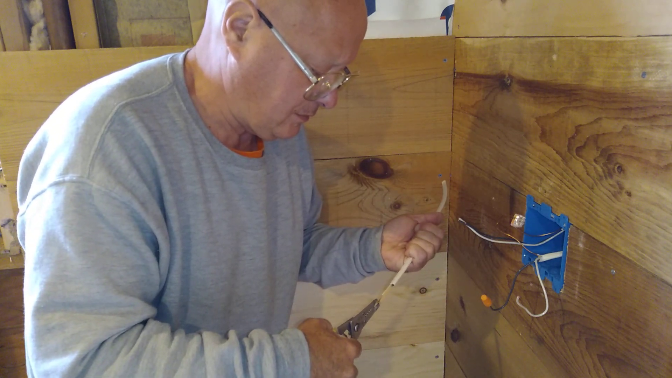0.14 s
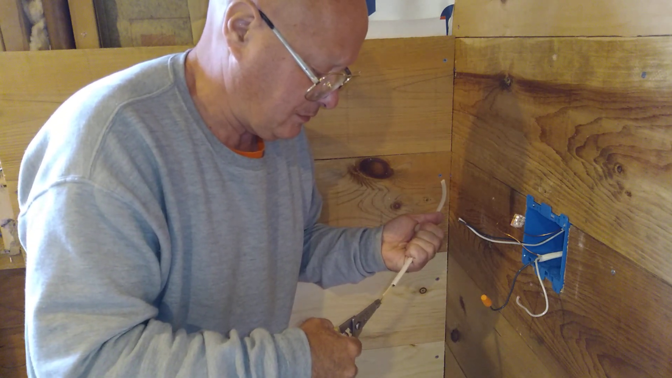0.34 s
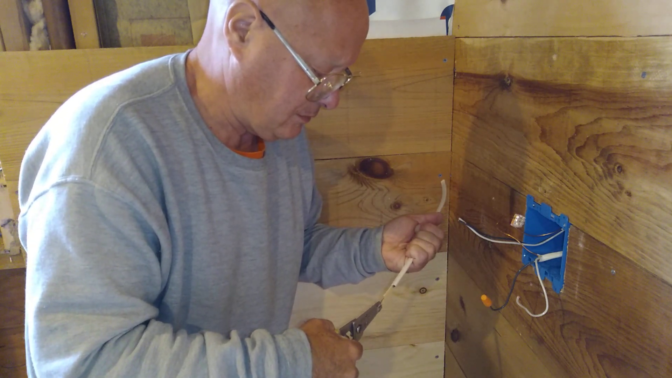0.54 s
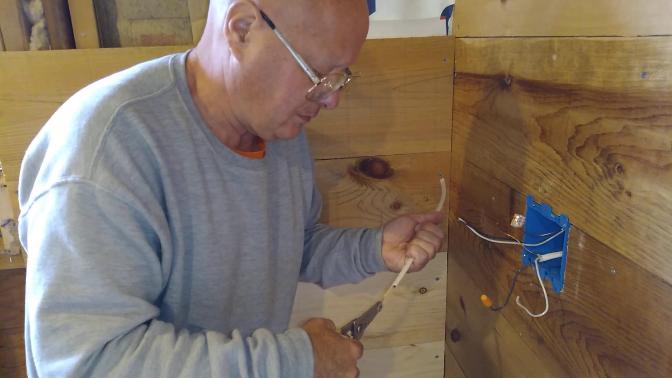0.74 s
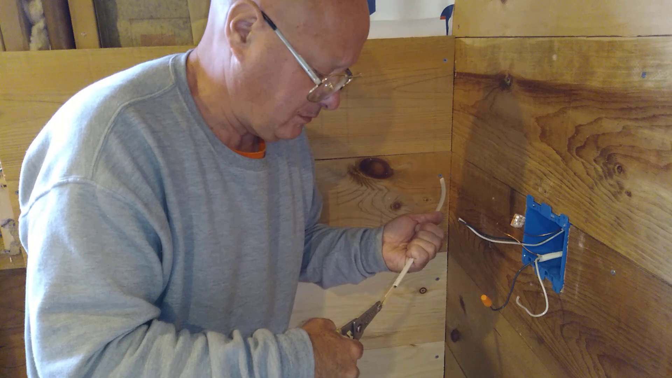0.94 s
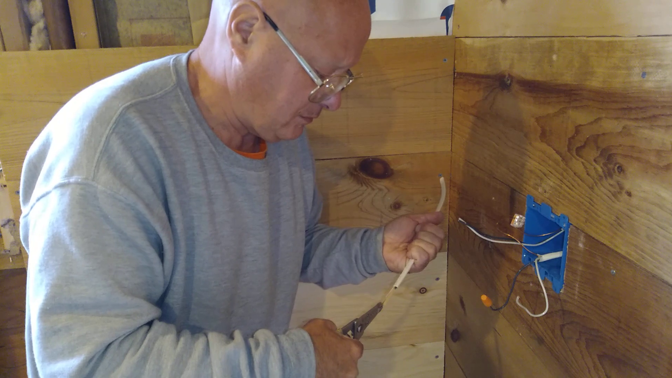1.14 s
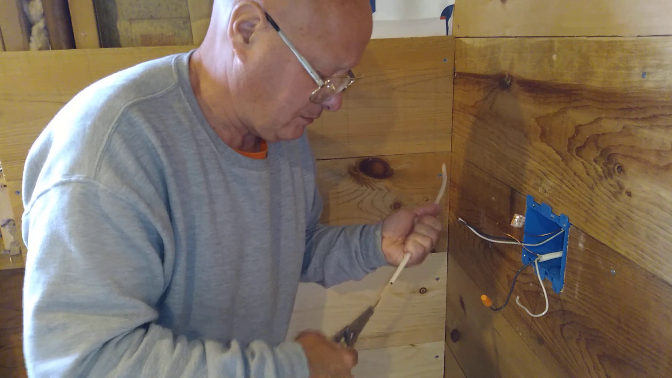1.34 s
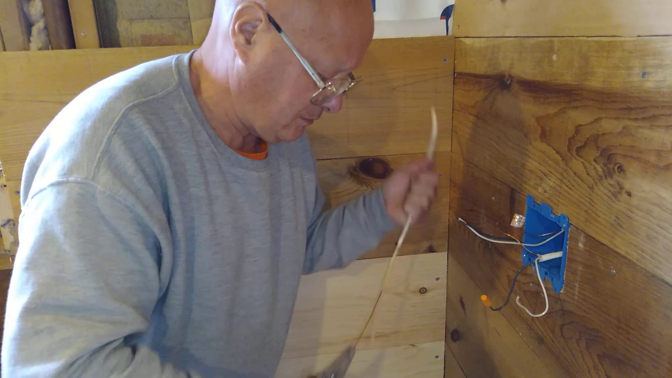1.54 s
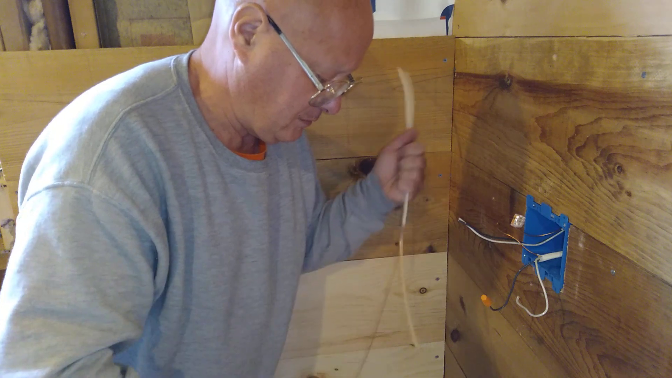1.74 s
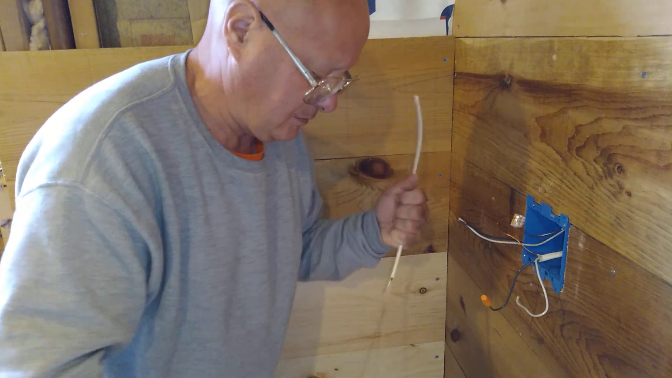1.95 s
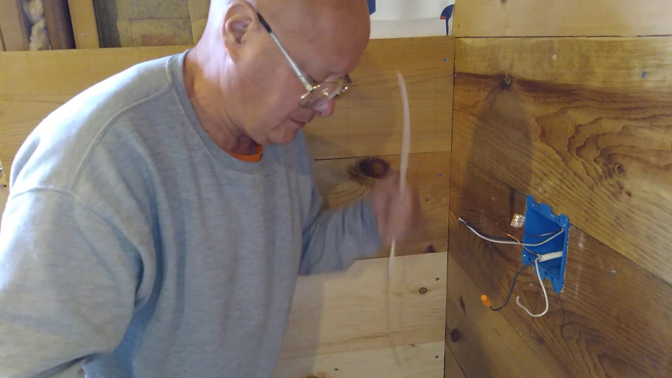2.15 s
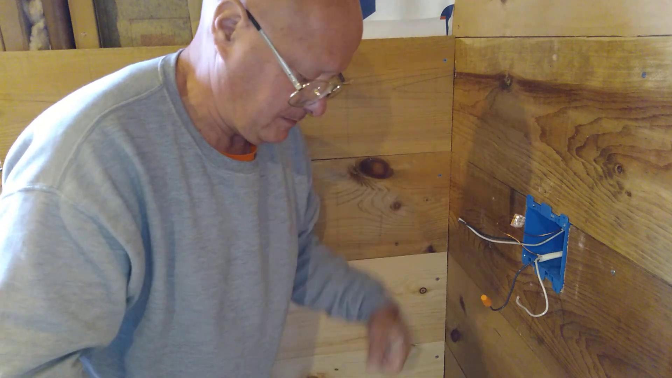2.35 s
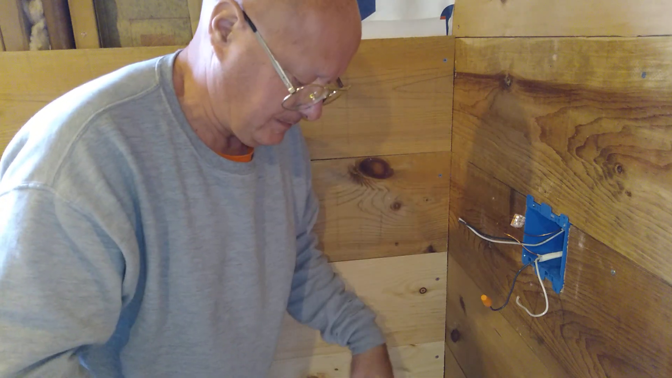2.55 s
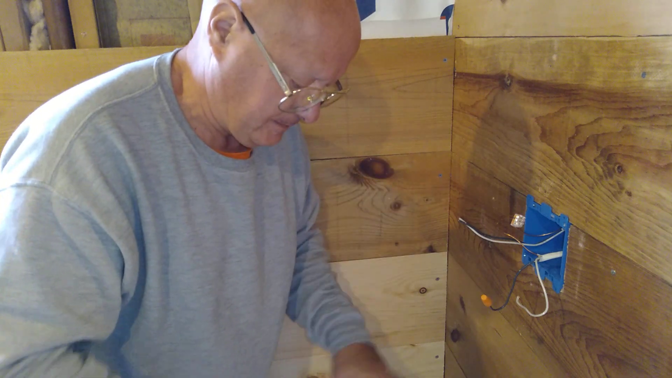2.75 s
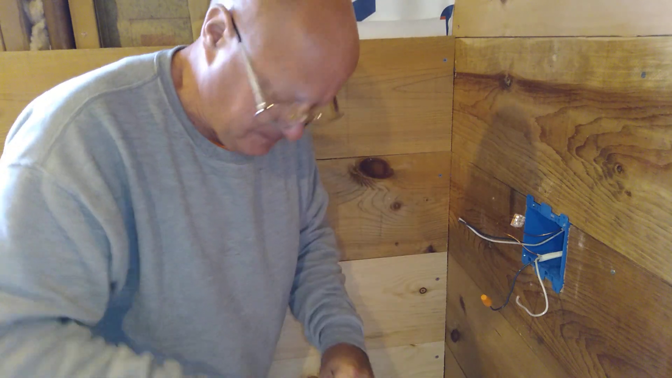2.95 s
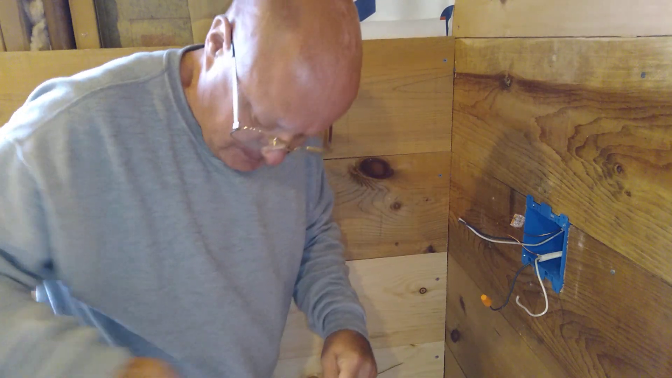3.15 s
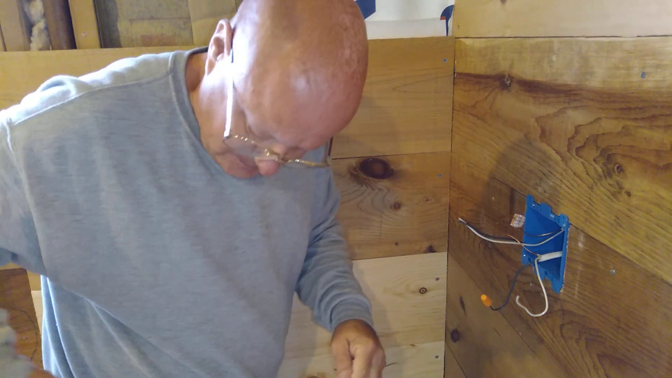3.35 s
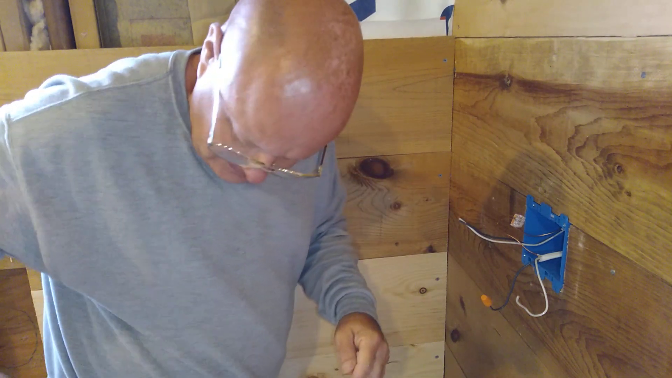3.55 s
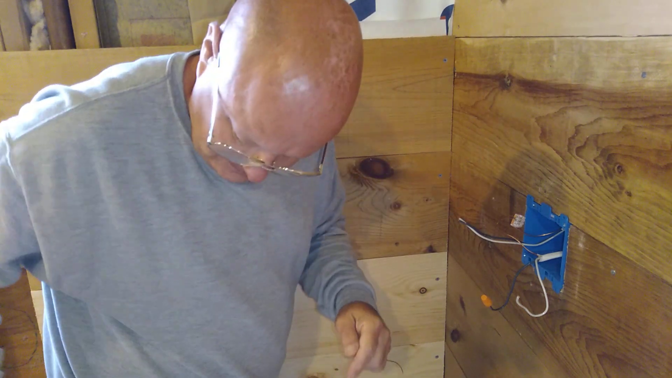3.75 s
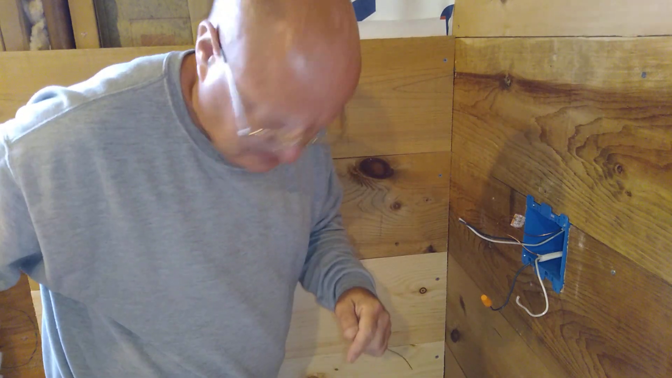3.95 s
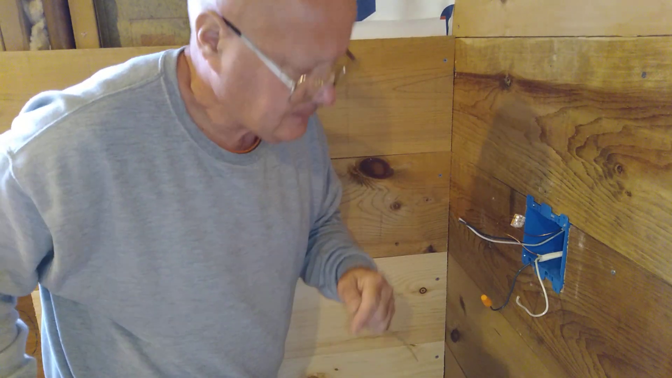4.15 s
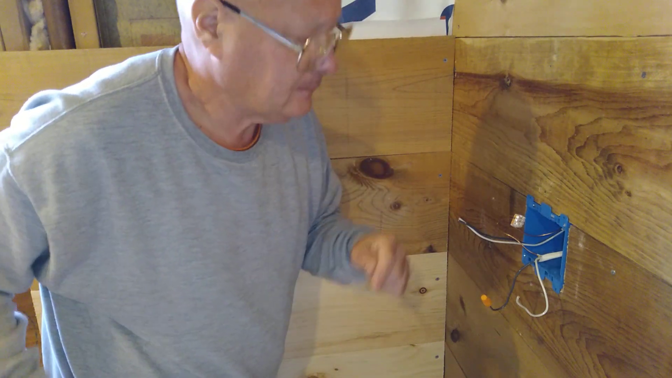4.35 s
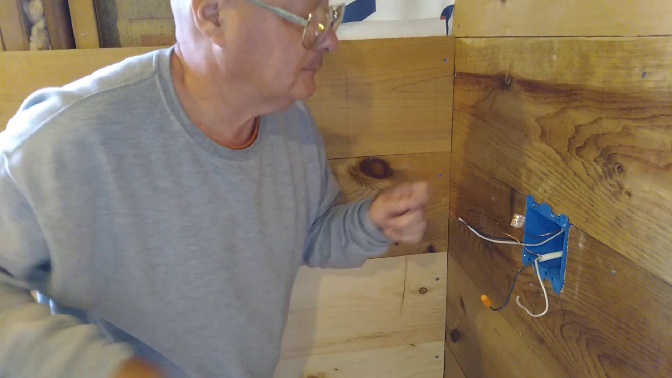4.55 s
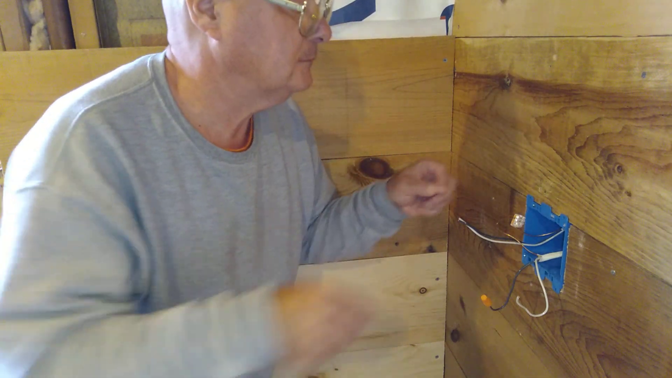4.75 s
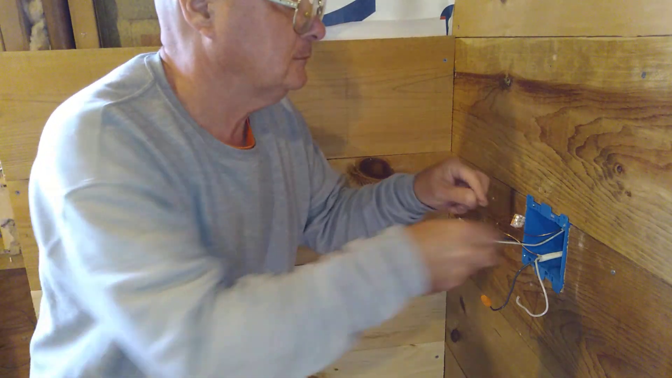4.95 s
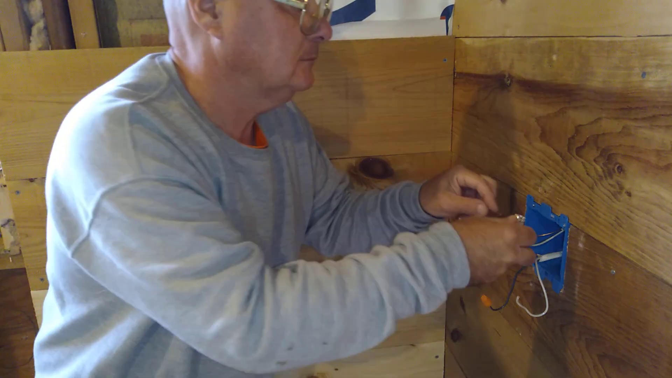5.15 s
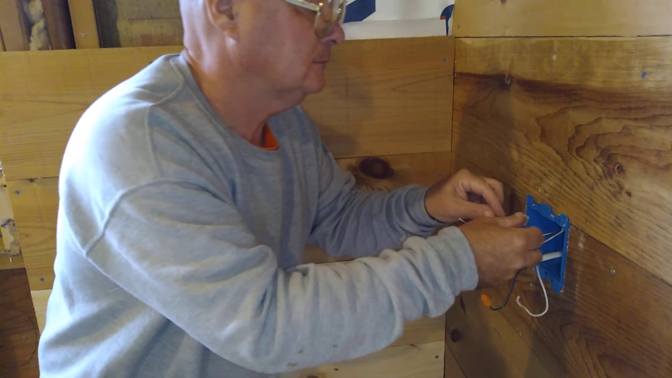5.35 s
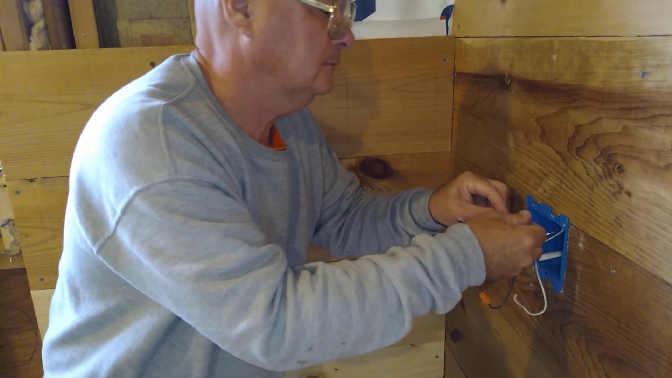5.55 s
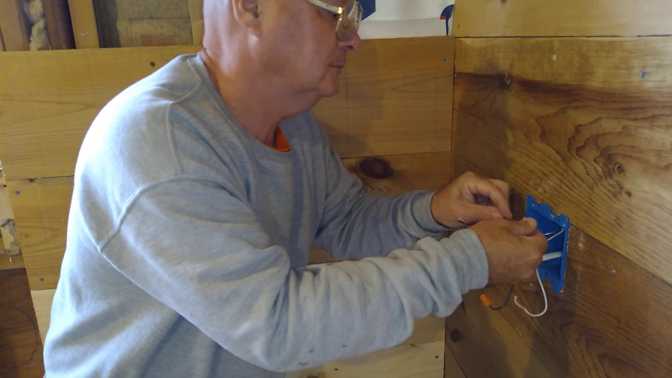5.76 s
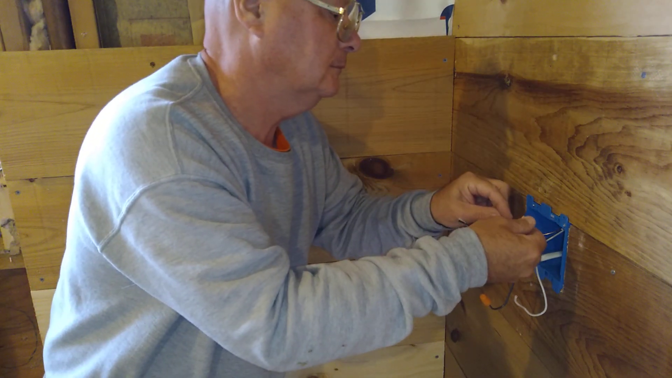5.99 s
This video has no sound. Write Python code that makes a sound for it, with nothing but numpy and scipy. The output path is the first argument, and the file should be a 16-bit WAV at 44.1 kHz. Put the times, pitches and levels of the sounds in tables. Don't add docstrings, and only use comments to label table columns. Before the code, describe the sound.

Cloth sleeves rustle and a hand tool ticks faintly in a quiet wooden room, then the tool drops on a board with one sharp snap.

```python
import sys
import numpy as np
from scipy import signal
from scipy.fft import rfft, irfft
from scipy.io import wavfile

SR = 44100
rng = np.random.default_rng(int(sys.argv[2]) if len(sys.argv) > 2 else 0)


def to_wav(sig):
    pcm = np.clip(np.atleast_2d(sig), -1, 1) * 32767
    pcm = np.round(pcm).astype(np.int16)
    wavfile.write(sys.argv[1], SR, pcm.T)


def invert_db(level):
    return 10 ** (np.asarray(level, dtype=float) / 20)


N = 265614


def clock(seconds):
    return np.arange(round(seconds * SR)) / SR


def in_time(rows):
    s, *columns = np.transpose(rows)
    return [np.interp(np.arange(N) / SR, s, c) for c in columns]


def at_hz(points, hz):
    table_hz, values = np.transpose(points)
    return np.interp(np.log(np.maximum(hz, 1)), np.log(table_hz), values)


def rms_one(x):
    return x / np.sqrt(np.mean(x ** 2) + 1e-20)


def panned(x, pan_db):
    return x * np.array([invert_db(pan_db / 2), invert_db(-pan_db / 2)]).reshape(2, -1)


def drift(rate):
    return np.interp(np.arange(N) * rate / SR, np.arange(400), rng.standard_normal(400))


def butter(x, order, hz, kind):
    return signal.sosfilt(signal.butter(order, hz, kind, fs=SR, output="sos"), x)


def resonance(x, hz, width):
    r = np.exp(-np.pi * width / SR)
    poles = [1, -2 * r * np.cos(2 * np.pi * hz / SR), r * r]
    return signal.lfilter([(1 - r * r) / 2, 0, (r * r - 1) / 2], poles, x)


def coloured(x, spectrum):
    size = 4096
    log_gain = at_hz(spectrum, np.fft.rfftfreq(size, 1 / SR)) * np.log(10) / 20
    cepstrum = irfft(log_gain)
    cepstrum[1:size // 2] *= 2
    cepstrum[size // 2 + 1:] = 0
    taps = rms_one(irfft(np.exp(rfft(cepstrum)))) / np.sqrt(size)
    return signal.oaconvolve(np.atleast_2d(x), taps[None], axes=1)[:, :np.shape(x)[-1]]


def swells(rows, rest_db):
    t, power = np.arange(N) / SR, invert_db(2 * rest_db)
    for s, db, rise, fall in rows:
        away = np.maximum((s - t) / max(rise, .003), (t - s) / max(fall, .003))
        power = power + invert_db(2 * db - 40 * np.maximum(away, 0))
    return np.sqrt(power)


# pitch_hz, likeness (0 to 1)
PORT_LIKENESS = [(60, 0.93), (150, 0.93), (280, 0.85), (640, 0.45), (1400, 0), (3000, .0), (15000, 0.009)]


def ports(pair):
    left, right = rfft(pair)
    alike = np.clip(at_hz(PORT_LIKENESS, np.fft.rfftfreq(pair.shape[1], 1 / SR)), 0, 1)
    mid = np.sqrt(1 + alike) * (left + right) / 2
    side = np.sqrt(1 - alike) * (left - right) / 2
    return irfft(np.array([mid + side, mid - side]), pair.shape[1])


def grains(per_s, spread_db):
    sizes = invert_db(spread_db * np.minimum(rng.exponential(1, (2, N)), 5))
    clicks = sizes * (rng.random((2, N)) < per_s / SR)
    return rms_one(ports(rng.standard_normal((2, N)) * (1.4 + clicks)))


def struck(modes, seconds, spread_db):
    t, out = clock(seconds), 0
    for hz, db, t60 in modes:
        luck_db = spread_db * rng.normal()
        out = out + invert_db(db + luck_db - 60 * t / t60) * np.sin(2 * np.pi * hz * t)
    return out


def add(out, s, sound):
    i = round(s * SR)
    out[:, i:i + sound.shape[1]] += sound[:, :N - i]


# pitch_hz, level_db (per Hz)
AIR_SPECTRUM = [(18, -40.5), (30, -9), (118, 4.5), (303, -9), (600, -6), (684, -15), (866, -10),
                (1390, -18.5), (2290, -14.5), (3580, -24.5), (10500, -13), (13500, -26), (16000, -34)]


def air():
    return invert_db(-66.5 - 9.0) * rms_one(coloured(ports(rng.standard_normal((2, N))), AIR_SPECTRUM))


# pitch_hz, level_db (per Hz)
RUMBLE_SPECTRUM = [(15, -51.5), (25, -32), (48, -2.5), (103, 3), (157, -4), (205, -3), (244, -2),
                   (330, -26.5), (430, -47.5), (730, -120)]
# peak_s, peak_db, fade_s (per 20 dB)
WEIGHT_SHIFTS = [
    (.25, -70.5, .5),
    (.85, -59, 0.2),
    (1.42, -61.5, .5),
    (2.05, -59.5, 0.22),
    (2.72, -57, 0.72),
    (3.48, -61.5, 0.43),
    (4.06, -55.5, 0.28),
    (4.66, -64, 0.5),
    (5.22, -63, 0.65),
    (5.75, -56, 0.26),
]
REST_WOOD_DB = -91.5


def floor_rumble():
    rumble = rms_one(coloured(ports(rng.standard_normal((2, N))), RUMBLE_SPECTRUM))
    shifts = [(s, db, .13, fade) for s, db, fade in WEIGHT_SHIFTS]
    return rumble * invert_db(1.0 * drift(13)) * swells(shifts, REST_WOOD_DB)


# pitch_hz, width_hz, level_db
SLIDE_RESONANCES = [(470, 390, 7.5), (800, 210, -18.5), (365, 240, -3.5), (1113, 140, -14),
                    (1950, 2700, -10)]
# peak_s, peak_db, fade_s (swell and fade per 20 dB)
BOARD_SLIDES = [
    (1.11, -66.5, 0.03),
    (1.61, -53.5, 0.1649),
    (2.15, -67, 0.74),
    (2.731, -53, 0.096),
    (3.1, -60, 0.72),
    (4.129, -51.5, 0.04),
    (4.26, -60.5, 0.31),
    (4.681, -63, 0.39),
    (5.25, -69.5, 0.44),
    (5.7, -71, 0.7),
]


def sliding():
    rub, slide = grains(330, spread_db=3.5), 0
    for k, (hz, width, db) in enumerate(SLIDE_RESONANCES):
        slide = slide + (-1) ** k * invert_db(db) * resonance(rub, hz, width)
    gestures = [(s, db, fade, fade) for s, db, fade in BOARD_SLIDES]
    return rms_one(slide) * invert_db(3.1 * drift(12)) * swells(gestures, REST_WOOD_DB)


# pitch_hz, level_db, t60_s
JOIST_MODES = [(69.3, -8, .3), (90, -1, 0.32), (134, -2, 0.34), (149, -3, 0.17), (205, -16, 0.14)]
# start_s, peak_db, pitch_hz, t60_s
FLOOR_THUMPS = [(0.162, -54, 68.4, 0.2), (0.214, -49.5, 63.6, 0.68), (0.756, -39.5, 147.8, 0.46),
                (1.403, -50, 107.3, 1), (1.574, -32.5, 178, 0.24), (1.62, -32.5, 228.3, 0.28),
                (1.97, -43, 130, 0.4), (2.666, -31, 182, 0.19), (2.802, -36, 214.5, 0.22),
                (3.43, -41, 181, 0.31), (4.011, -44.5, 189.6, 0.42), (4.183, -44, 176.5, 0.58),
                (4.319, -50, 177, 0.16), (4.584, -44.5, 187, 0.43), (4.661, -46, 149, 0.28),
                (5.16, -50, 86, 0.23), (5.212, -37.5, 229, 0.14), (5.238, -43.5, 82.8, 0.29),
                (5.7, -45.5, 161.6, 0.34), (5.772, -39.5, 246.5, 0.15)]


def thumps():
    out, t = np.zeros((2, N)), clock(.6)
    joists = [(f, level - 1.5, 0.77 * decay) for f, level, decay in JOIST_MODES]
    for s, db, hz, t60 in FLOOR_THUMPS:
        t60 = max(t60, .03)
        body = struck([(hz, 0, t60), (hz * 1.13, -6, t60)] + joists, .6, spread_db=1.0)
        add(out, s, panned(invert_db(db - 9) * body * (1 - np.exp(-t / 0.0054)), 0))
    return out


# pitch_hz, width_hz, level_db
BOX_RESONANCES = [(527, 54, 4.5), (614, 56, 2.5), (1010, 130, 8.5)]
# peak_s, peak_db, rise_s, fall_s (per 20 dB), upper_db (upper resonance, relative)
BOX_CREAKS = [
    (0.535, -76.5, 0.021, 1.3, -1.5),
    (1.109, -73.5, 0.12, 0.14, -3.5),
    (.96, -74, 0.076, 0.44, -30),
    (1.264, -78.5, 0.045, 0.5, -43),
    (2.47, -66.5, 0.14, 0.33, -11.5),
    (3.669, -59.5, 0.056, 0.13, -36),
]


def creak():
    slips, bands = grains(200, spread_db=4.0), []
    for hz, width, db in BOX_RESONANCES:
        bands.append(rms_one(resonance(resonance(slips, hz, width), hz, 3 * width)) * invert_db(db))
    low, high, upper = bands
    deep = swells([(s, db, rise, fall) for s, db, rise, fall, _ in BOX_CREAKS], rest_db=-120)
    bright = swells([(s, db + up_db, rise, fall) for s, db, rise, fall, up_db in BOX_CREAKS], rest_db=-120)
    return invert_db(-4.0) * (deep * (low - high) + bright * upper)


# pitch_hz, level_db (per Hz)
HISS_SPECTRUM = [(3240, -62), (5000, -32), (6880, -25.5), (8400, -11.5), (9300, -2), (10800, -0.5),
                 (12400, -8.5), (14000, -11.5), (15300, -3), (15900, -5)]
# peak_s, peak_db, rise_s, fall_s (per 20 dB), airy_db (airy top, relative)
CLOTH_STROKES = [(0.034, -55, 0.283, 0.14, -3), (0.152, -49, 0.067, 0.316, -1.5),
                 (0.198, -49, 0.11, 0.217, -4), (0.455, -55.5, 0.0057, 0.42, -2),
                 (0.988, -50, 0.051, 0.3, -1), (1.266, -62, 0.038, 1, 6), (1.355, -39.5, 0.088, 0.3, -8),
                 (1.497, -37.5, 0.14, 0.12, -5), (1.616, -50, 0.053, 0, 5), (1.812, -52, 0.14, -0.9, -8),
                 (1.927, -34.5, 0.024, 0.125, -6), (1.972, -31, 0.084, 0.05, 0.5),
                 (2.109, -52.5, 0.079, 0.7, 2), (2.338, -51, 0.14, 0.6, -2), (2.62, -41.5, 0.24, 0.5, 0.5),
                 (2.801, -24.5, 0.0059, 0.06, -3), (2.53, -42, 0.026, 0.34, 1),
                 (3.008, -46.5, 0.14, 0.11, -12), (3.318, -46, 0.077, 0.05, -8),
                 (3.555, -48, 0.21, 0.03, -4), (3.581, -30.5, 0.017, 0.0633, -2.5),
                 (3.595, -45, 0.182, 0.2, -5), (3.759, -43.5, 0.31, 0.17, -7),
                 (3.867, -42.5, 0.063, 0.09, -5), (3.968, -40.5, 0.03, 0.23, 0),
                 (4.099, -40, 0.21, 0.0852, -5), (4.2, -48.5, 0.0054, 0.25, -14.5),
                 (4.301, -48.5, 0.0066, 0.07, -15), (4.771, -54, 0.13, -0.03, -6.5),
                 (4.908, -43.0, 0.11, 0.101, -4.5), (5.06, -45.5, 0.12, 0.04, -2),
                 (5.118, -55, 0.673, 0.08, -16), (5.177, -41.5, 0.07, 0.12, -3.5),
                 (5.241, -42, 0.24, 0.23, -7), (5.415, -54.5, 0.164, 0, 1.5),
                 (5.512, -62.5, 0.068, -0.1, -4), (5.684, -64, 0.012, -0.7, -9.5),
                 (5.84, -51.5, 0.025, 0, -4.5), (5.89, -44, 0.006, 0.35, -8.5), (6.02, -54.0, 0.3, 2, -6)]


def sleeves(rub, flicker):
    hiss = coloured(rub, HISS_SPECTRUM) * invert_db(0.9 * flicker)
    airy_hz = 12400
    body = rms_one(butter(hiss, 4, airy_hz, "low"))
    top = rms_one(butter(np.roll(hiss, N // 3, axis=1), 4, airy_hz, "high"))
    body_gain = swells([(s, db - 2.0, rise, fall) for s, db, rise, fall, _ in CLOTH_STROKES], rest_db=-77)
    top_gain = swells([(s, db + airy_db, rise, fall) for s, db, rise, fall, airy_db in CLOTH_STROKES],
                      rest_db=-94)
    return body * body_gain + top * top_gain


# pitch_hz, level_db (per Hz)
SCRAPE_SPECTRUM = [(940, -39), (1500, -24.5), (2500, -15), (3300, -16.5), (5200, -12), (6200, -12.5),
                   (8000, -1.5), (10400, -25), (17600, -120)]
# peak_s, peak_db (between 2 and 6 kHz), rise_s, fall_s (per 20 dB)
FIRM_PULLS = [(0.18, -86, 0.041, 1.5), (0.256, -73.5, 0.1, 0.4), (0.669, -77, 0.023, 0.3),
              (0.786, -85, 0.109, 0.5), (0.975, -75.5, 0.028, 0.6), (1.124, -73, 0.25, 0.1),
              (1.338, -55.5, 0.083, 0.42), (1.431, -54, 0.13, 0.15), (1.499, -53.5, 0.141, 0),
              (1.573, -52.5, 0.046, 0.01), (1.955, -56.0, 0.089, 0.16), (2.199, -66.5, 0.16, 0.23),
              (2.619, -63, 0.12, -0.3), (2.719, -60, 0.37, 0), (2.8, -40, 0.003, 0.05),
              (2.803, -52, 0.0092, 0.32), (2.811, -40, 0.01, 0.0061), (2.837, -50.0, 0.026, 0.07),
              (3.303, -70.5, 0.775, 0.6), (3.314, -64, 0.061, 0.074), (3.571, -63, 0.049, 0.15),
              (3.748, -72.0, 0.682, -0.53), (3.991, -74.0, 0.072, -2), (4.091, -62.5, 0.048, 0.2),
              (4.198, -60.5, 0.061, 0.06), (4.297, -57, 0.0061, 0.14), (4.318, -74.5, 0.039, 0.3),
              (4.58, -85.5, 0.01, 0.4), (4.765, -74, 0.02, 0.3), (5.267, -72.5, 0.83, 0.12),
              (5.481, -79, 0.0066, 0), (5.92, -79.5, 0.32, 0)]


def scrapes():
    scrape = coloured(grains(3200, spread_db=3.5), SCRAPE_SPECTRUM)
    middle = butter(scrape, 4, [2200, 6000], "band")
    scrape = scrape / np.sqrt(np.mean(middle ** 2)) * invert_db(1.7 * drift(21))
    return scrape * swells(FIRM_PULLS, rest_db=-93)


# pitch_hz, level_db, t60_s
JAW_MODES = [(9150, -4, .025), (11800, -5, .03), (12700, -12, .02), (13900, -12, .02), (14900, -6, .025),
             (15400, 0, .03)]
# peak_s, peak_db, rise_s, fall_s (per 20 dB)
JAW_SINGS = [(.16, -62, .06, 0.1), (.46, -70, .01, 0.8), (1.63, -54, .02, 1.5), (1.8, -61, .08, -2),
             (2.12, -58, 0.018, 0.5), (2.33, -60, .15, 0), (3.5, -62, 0.077, 0.3), (3.95, -50, .02, 0.1),
             (4.98, -58, 0.099, 0.3), (5.42, -62.5, .03, 0.2), (5.85, -60, .02, .5)]


def singing_jaws(rub, flicker):
    width_hz, flicker_db = 190, 5.0
    sing = 0
    for k, (hz, db, _) in enumerate(JAW_MODES):
        band = resonance(resonance(rub, hz, width_hz), hz, 3 * width_hz)
        sing = sing + invert_db(db + flicker_db * np.roll(flicker, k * N // 7)) * band
    return rms_one(sing) * swells(JAW_SINGS, rest_db=-100)


# time_s, pan_db (left minus right)
HAND_PAN = [(0, 0.5), (.72, 1), (.95, 5.5), (1.1, 2), (1.72, 0.5), (1.8, 4), (1.87, -1), (2.02, -2.5),
            (2.12, 3), (2.34, 0), (3.3, -3), (4.11, -6), (4.39, 0), (4.74, -9), (5.45, -6), (5.8, -9),
            (6.02, -7)]


def rustle():
    rub, flicker = grains(10000, spread_db=4.0), drift(28)
    return panned(sleeves(rub, flicker) + singing_jaws(rub, flicker) + scrapes(), *in_time(HAND_PAN))


# start_s, level_db, pitch_hz (resonance), width_hz, fade_s
GRIT_SCUFFS = [(.16, -66, 330, 620, 0.15), (.15, -73.5, 2670, 1500, 0.11), (.232, -59, 400, 900, 0.023),
               (1.556, -42, 1170, 1340, 0.029), (2.184, -54.5, 2800, 1510, 0.029),
               (2.7998, -16, 4000, 660, 0.0014), (2.7996, -13.5, 5500, 860, 0.0012),
               (2.7975, -29.5, 20100, 5000, 0.0042), (2.83, -30, 240, 110, 0.03),
               (2.96, -41, 950, 1240, 0.0097), (3.6, -71, 3640, 500, 0.015), (4.092, -50, 1220, 390, 0.028),
               (4.116, -50, 1430, 450, 0.046), (4.152, -53, 3550, 690, 0.012),
               (4.135, -60, 1200, 980, .012), (4.23, -49.5, 640, 640, 0.015),
               (5.485, -64.5, 2900, 750, 0.025), (4.205, -57.5, 3660, 1100, 0.04),
               (4.764, -60, 2830, 1500, 0.043), (4.6, -61.5, 340, 620, 0.11), (5.19, -59.5, 270, 600, 0.11),
               (5.485, -58, 1650, 1500, 0.034), (.2398, -50, 5500, 1700, 0.001),
               (1.2, -75, 2100, 930, 0.028), (4.303, -42.5, 1190, 340, 0.026), (1.3, -51, 6200, 3000, 0.2),
               (2.84, -33, 520, 120, 0.023), (2.868, -38, 890, 200, 0.025), (4.086, -61, 3800, 700, 0.046),
               (4.228, -56, 3800, 900, .01), (5.53, -62, 1900, 1500, 0.041), (5.545, -59, 600, 700, .03),
               (2.1825, -45, 3700, 2200, .0015), (2.7925, -40, 3500, 3000, 0.0022),
               (3.2, -63.5, 1600, 1000, 0.044), (2.408, -54, 9500, 4100, .12)]


def scuffs():
    out, t, grit = np.zeros((2, N)), clock(.4), grains(390, spread_db=6.0)
    for k, (s, db, hz, width, fade) in enumerate(GRIT_SCUFFS):
        piece = grit[:, k * 7000:k * 7000 + len(t)]
        burst = rms_one(resonance(resonance(piece, hz, width), hz, width))
        onset = np.minimum(t / max(0.13 * fade, .0003), 1)
        add(out, s, invert_db(db) * burst * np.exp(-t / max(fade, .0006)) * onset)
    return out


# pitch_hz, level_db, t60_s
BOARD_MODES = [(221, -6, 0.065), (285, -7.5, 0.058), (342.8, -21, .04), (439, -2, 0.05), (529, -4.5, 0.097),
               (658, -9, 0.052), (821.5, -2.5, 0.029), (1068, -4, 0.05), (1250, -15, 0.077),
               (1750, -4.5, 0.031)]
# pitch_hz, level_db (per Hz)
CRACK_SPECTRUM = [(1180, -28), (2000, -8), (2810, -8), (3710, -3.5), (5540, -4), (7840, -8), (9250, 3.5),
                  (11000, -2.5), (15200, -4.5), (16000, -6)]
# start_s, peak_db, pitch_hz, crack_db (relative), t60_s
BOARD_KNOCKS = [(.755, -54.5, 296, -25.5, 0.37), (1.45, -40, 205, -4, 0.039), (1.558, -46, 236, 3, 0.3),
                (1.563, -38.5, 187, 10.5, 0.08), (1.587, -33.5, 238, -3, 0.094),
                (1.976, -45.5, 241, 7, 0.11), (2.183, -44, 800, 4, 0.057), (2.646, -48.5, 864, -0.5, 0.096),
                (2.8001, -7.5, 668, -5.5, 0.049), (2.8065, -7.5, 851, -13, 0.053),
                (2.8131, -16, 460, -22, 0.033), (2.9605, -20.5, 235, -13, 0.06),
                (3.0566, -23, 265, -19, 0.025), (3.478, -48, 216.4, -20, 0.09),
                (3.655, -48.5, 520, -12.5, 0.045), (2.8025, -14.5, 245.4, -40, 0.06),
                (4.076, -46, 589, -12.5, 0.033), (4.085, -42, 491, -4, 0.13),
                (4.116, -41, 767, -10.5, 0.07), (4.157, -41, 552, -5, 0.073), (4.199, -37, 498, 1, 0.12),
                (4.285, -34, 494, -17, 0.027), (4.301, -22.5, 504, -4, 0.055),
                (4.336, -32.5, 546, -30, .15), (4.581, -46.5, 189, -27, 0.13),
                (5.4837, -39.5, 720, -12, 0.081), (5.692, -55, 965, -8.5, 0.028)]


def knocks():
    out, t = np.zeros((2, N)), clock(.4)
    for s, db, hz, crack_db, t60 in BOARD_KNOCKS:
        t60 = max(t60, .01)
        thud_db = -14.5 - 0.24 * db
        near = [(f, level - 6.54 * abs(np.log2(f / hz)), decay * t60 / 0.081)
                for f, level, decay in BOARD_MODES]
        body = struck([(hz, -2, t60)] + near, .4, spread_db=2.0)
        noise = rng.standard_normal((4, len(t)))
        wide = noise[0] + 0.66 * noise[1] * [[1], [-1]]
        thud = rms_one(resonance(wide, hz * 1.14, hz * 0.74)) * invert_db(thud_db - 60 * t / (1.51 * t60))
        snap = np.exp(-t / 0.0023) + 0.33 * np.exp(-t / 0.0083)
        crack = coloured(noise[2:] * snap, CRACK_SPECTRUM)
        swell = 1 - np.exp(-t * hz / .7)
        add(out, s, invert_db(db - 4.0) * (body + thud) * swell + invert_db(db + crack_db - 4.0) * crack)
    return out


# start_s, peak_db, ring_db (relative), pitch_hz (favoured), crackle_s
STEEL_TICKS = [(0.2394, -23.5, -35, 10200, .001), (.455, -40, -16.5, 9500, 0.0011),
               (0.9453, -45, -13, 15000, .003), (0.9777, -53, -10, 12000, .003),
               (1.1677, -45, -23, 8570, 0.0022), (1.2476, -42, -19, 8000, 0.0027),
               (1.495, -35.5, -33, 10000, 0.018), (1.6187, -35.5, -10.5, 9100, .004),
               (1.769, -40, -16, 15300, 0.0035), (1.806, -35, -17, 13900, 0.0086),
               (1.8855, -45, -33, 10500, 0.0024), (1.9057, -27, -27, 10600, .003),
               (2.105, -34, -11, 15300, 0.011), (2.309, -43, -9, 15200, 0.0033),
               (2.3297, -34, -25, 9190, 0.0056), (2.407, -38.5, -15, 10100, .003),
               (2.793, -25, -30, 11000, 0.0011), (2.8135, -12, -28, 11200, .002),
               (2.82, -20, -27, 11500, .002), (2.852, -20, -30.5, 11800, 0.0024),
               (3.0003, -27.5, -24, 11100, 0.0054), (3.0979, -38, -27, 9900, 0.0022),
               (3.2959, -36, -17, 10800, .003), (3.4609, -35, -12, 13300, 0.0033),
               (3.569, -24.5, -23, 10000, .004), (3.5786, -8, -27, 15400, 0.0027),
               (3.587, -18, -28.5, 9800, 0.0018), (3.9345, -29.5, -12, 15300, 0.0034),
               (3.965, -22, -22, 9200, 0.0017), (4.096, -30, -26, 15400, 0.0037),
               (4.1953, -26.5, -28.5, 9600, 0.0035), (4.2015, -18.5, -40, 9100, 0.0011),
               (4.7466, -39, -24, 10400, 0.0023), (4.7642, -32.5, -23, 9300, 0.0021),
               (4.8439, -38, -25, 10970, 0.0034), (5.232, -28, -24.5, 9660, 0.0051),
               (5.261, -29.5, -25, 10750, 0.0057), (5.414, -48, -4, 15000, .003),
               (5.5074, -53.5, -4.5, 11800, .003), (5.8364, -43.5, -6, 15400, 0.0028)]


def ticks():
    out, t = np.zeros((2, N)), clock(.4)
    pan_db, = in_time(HAND_PAN)
    for s, db, ring_db, hz, crackle_s in STEEL_TICKS:
        noise = rng.standard_normal((2, 2, len(t))) * np.minimum(t / 0.00051, 1)
        crackle = coloured(noise[0] * np.exp(-t / max(crackle_s, .0004)), HISS_SPECTRUM)
        crackle = 0.64 * crackle + resonance(crackle, hz, 2300)
        modes = [(f, level - 25.5 * abs(np.log2(f / hz)), t60) for f, level, t60 in JAW_MODES]
        ring = struck(modes, .06, spread_db=2)
        ring = ring * np.minimum(np.arange(len(ring)) / (.0015 * SR), 1)
        ring = ring / np.sqrt(np.sum(ring ** 2))
        blows = noise[1] * np.exp(-t / .032)
        chatter = signal.oaconvolve(blows, ring[None], axes=1)[:, :len(t)]
        tick = invert_db(db - 6.0) * crackle + invert_db(db + ring_db + 0.5) * chatter
        add(out, s, panned(tick, pan_db[round(s * SR)]))
    return out


# pitch_hz, t60_s
ROOM_DECAY = [(100, 0.19), (500, 0.48), (2000, 0.43), (8000, 0.21), (12000, .23), (15000, 0.27)]


def room(x):
    t, tail = clock(.7), 0
    for low in 44 * 2. ** np.arange(9):
        band = butter(rng.standard_normal((2, len(t))), 2, [low, min(2 * low, .45 * SR)], "band")
        tail = tail + band * invert_db(-60 * t / at_hz(ROOM_DECAY, low * np.sqrt(2)))
    tail = ports(tail) * (t > .005)
    return signal.oaconvolve(x, rms_one(tail) / np.sqrt(len(t)), axes=1)[:, :N]


def scene():
    background = air() + floor_rumble() + sliding() + thumps() + creak()
    boards, steel = scuffs() + knocks(), ticks()
    wet = room(invert_db(-15.5) * steel + invert_db(-9.5) * boards)
    return background + rustle() + boards + steel + wet


def low_pass(x):
    return signal.sosfilt(signal.butter(12, 17040, fs=SR, output="sos"), x)


def record(dry):
    thin = butter(dry, 4, 52, "high")
    rounded = .9 * np.tanh(thin / .9)
    mix = signal.sosfilt(signal.cheby2(20, 55, 16200, fs=SR, output="sos"), rounded)
    return low_pass(mix)


dry = scene()
out = record(dry)
to_wav(out)
```